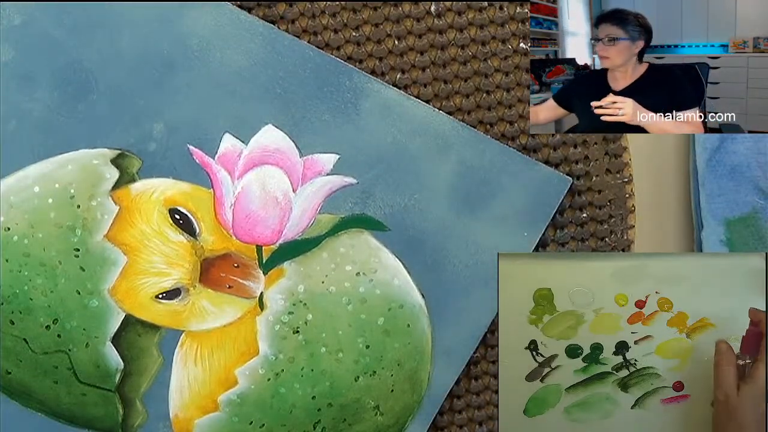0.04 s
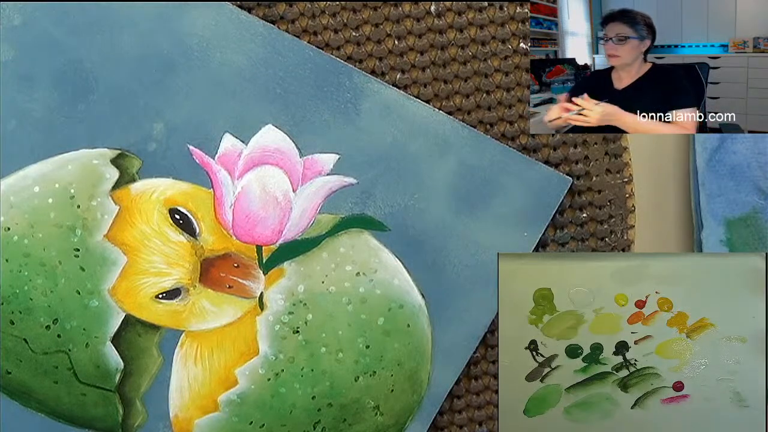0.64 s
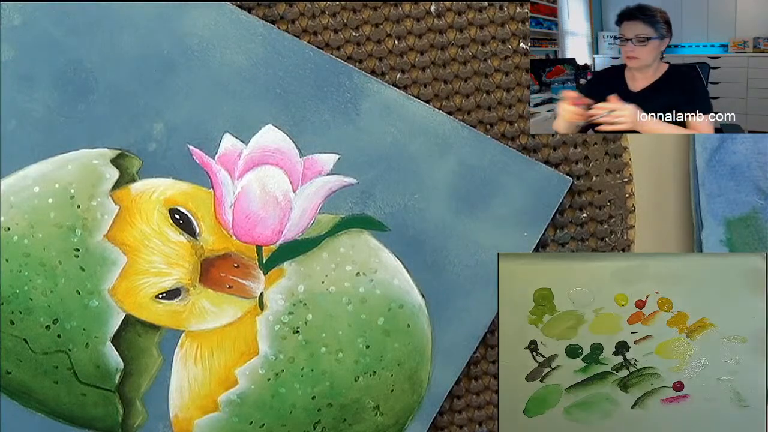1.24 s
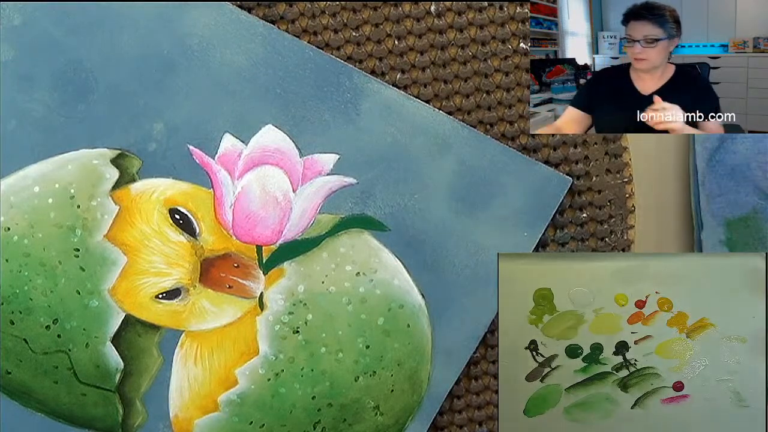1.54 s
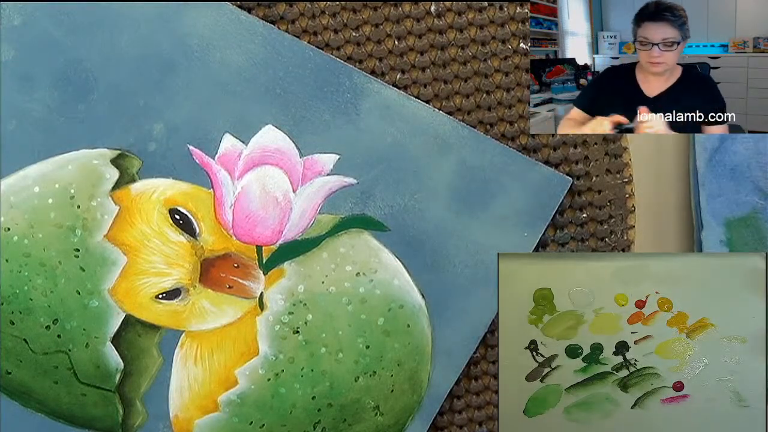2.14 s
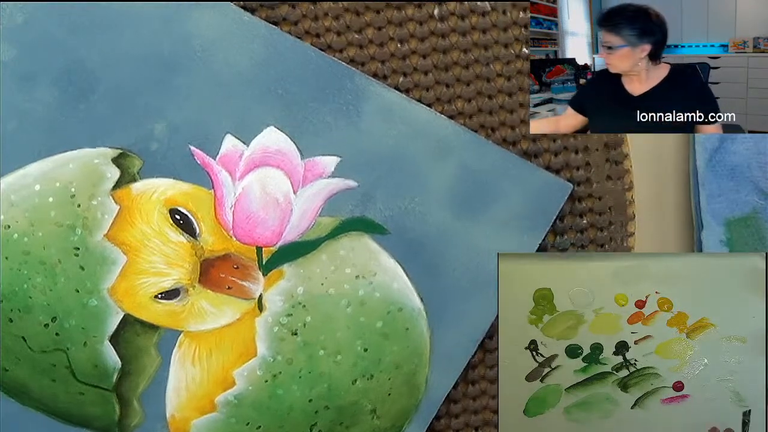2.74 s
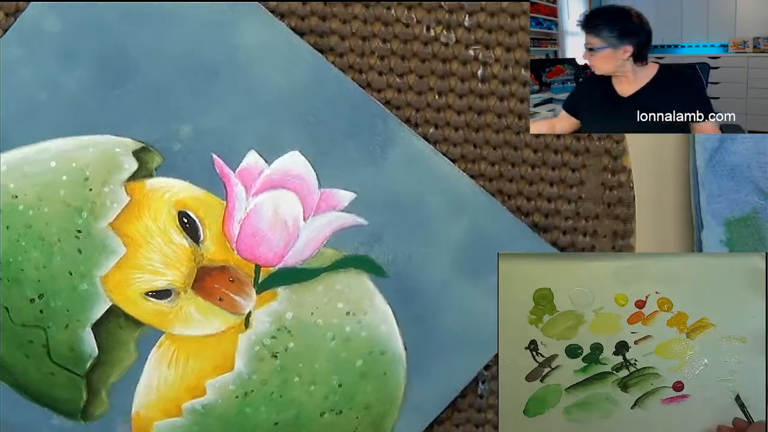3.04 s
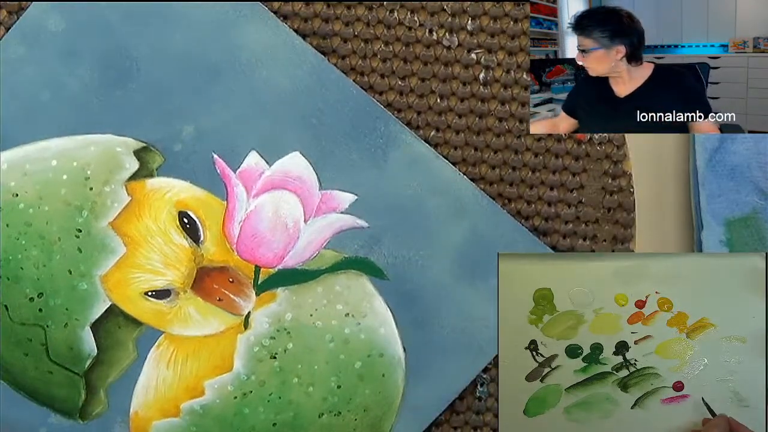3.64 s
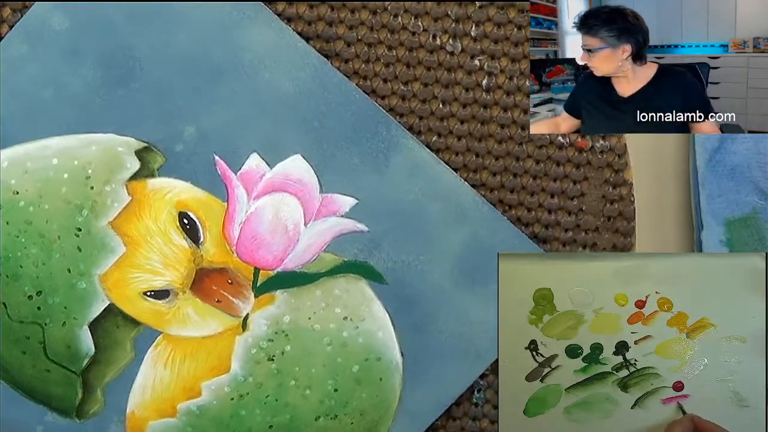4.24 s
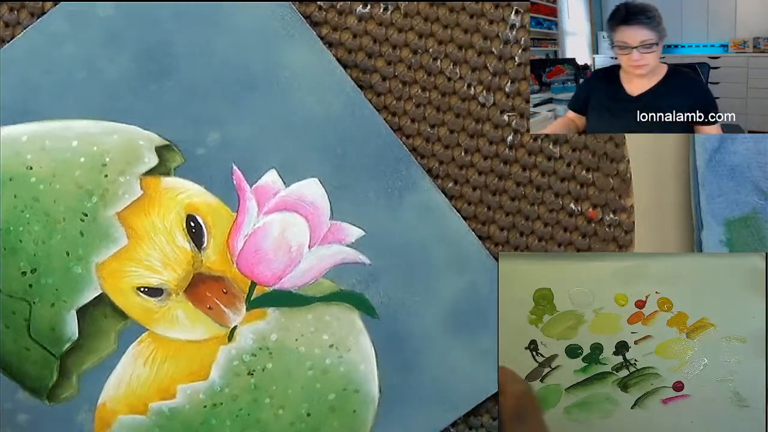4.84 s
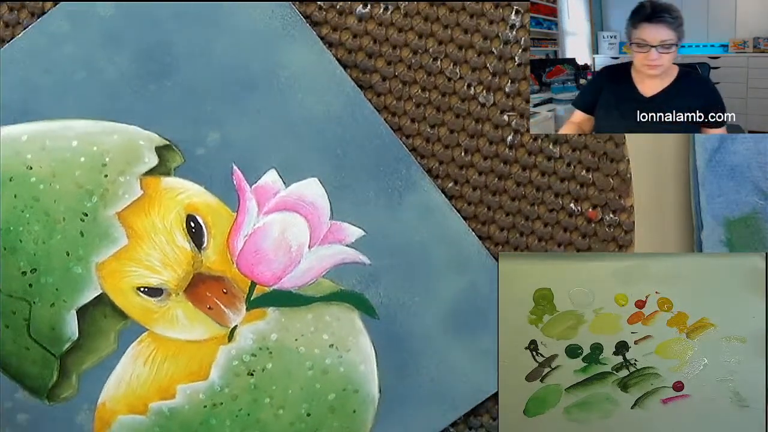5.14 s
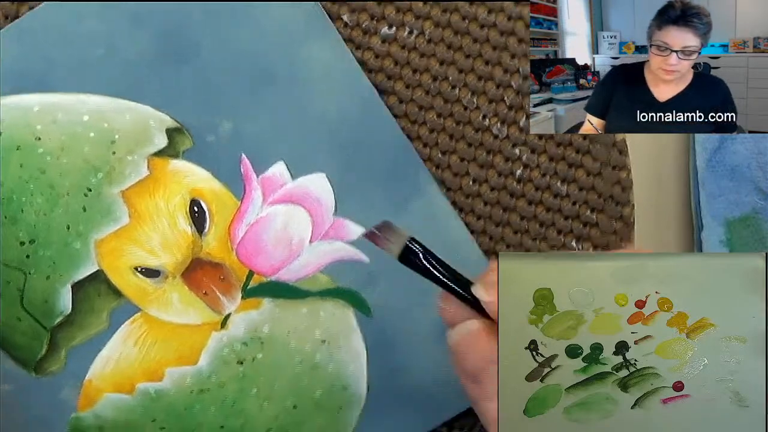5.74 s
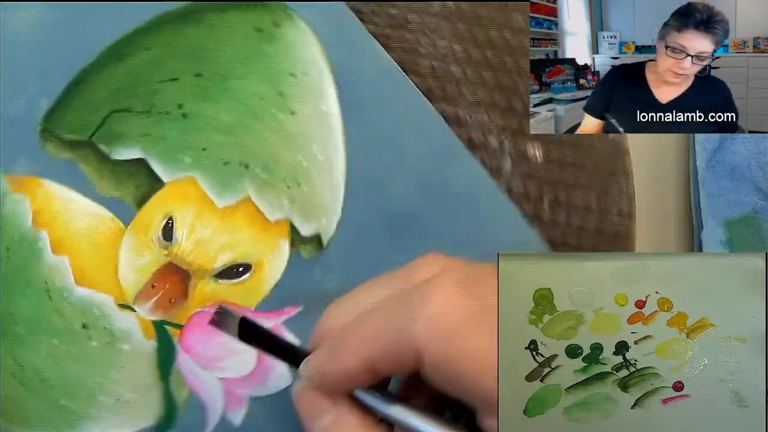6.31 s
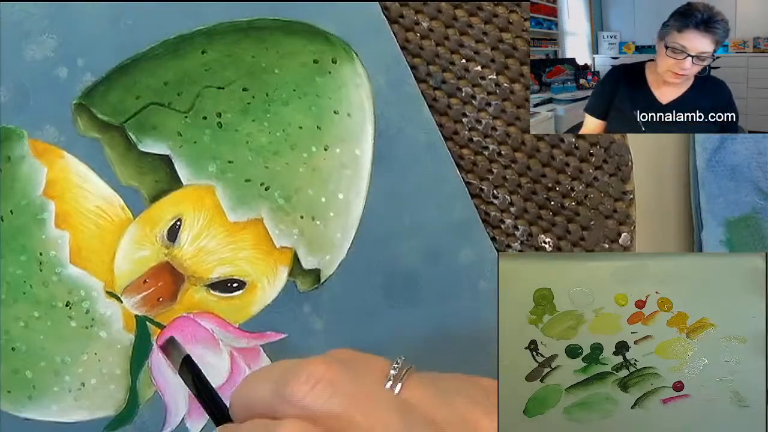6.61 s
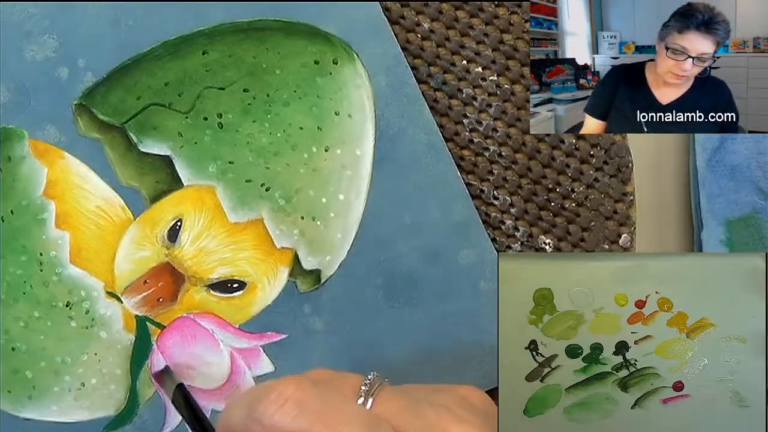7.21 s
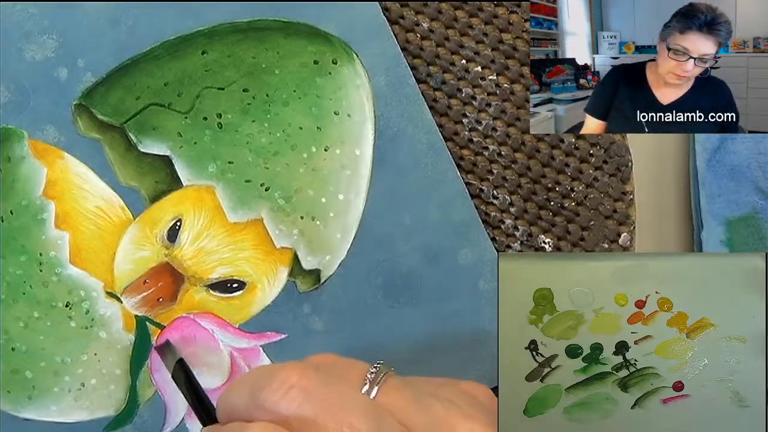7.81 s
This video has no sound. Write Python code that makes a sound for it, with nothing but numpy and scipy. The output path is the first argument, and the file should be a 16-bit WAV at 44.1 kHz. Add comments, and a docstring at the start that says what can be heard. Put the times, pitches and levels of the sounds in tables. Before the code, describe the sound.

In a small room with a steady hum, a fan and a faint thin whine, a spray bottle hisses three times in quick succession. Loud plastic snaps follow, then a soft knock as it is put down. A board shifts over a woven mat in scratchy pushes, a brush is wiped softly, and something taps the desk near the end, all heard from close by.

```python
"""Three quick puffs of mist from a finger-pump bottle, close to one microphone at a painter's desk.
The plastic cap snaps on and the bottle is put down. A painted board is turned on a woven mat,
scraping and catching on the weave; a brush is wiped in short strokes and something taps the desk.
Behind it all, mains hum, a fan and a thin electronic whine fill the small room."""
import sys
import numpy as np
from scipy import signal
from scipy.fft import rfft, irfft
from scipy.io import wavfile

SR = 44100
rng = np.random.default_rng(int(sys.argv[2]) if len(sys.argv) > 2 else 0)


def materialize(psi):
    """Save the field psi as 16-bit PCM at rate SR to the path in sys.argv[1].

    A 1-D psi becomes a single channel; in a 2-D psi each row is a channel.
    """
    bounded = np.clip(np.atleast_2d(psi).T, -1, 1)
    quanta = np.round(bounded * 32767).astype(np.int16)
    wavfile.write(sys.argv[1], SR, quanta)


N = 351477
TIME = np.arange(N) / SR

# Pump strokes: start t/s, end t/s, level/dB
PUMP_STROKES = [(0.001, 0.026, -36), (0.155, 0.162, -33.5), (0.198, 0.232, -36.5), (0.359, 0.361, -33.5),
                (0.394, 0.413, -35.5)]
# Spectrum of the spray: f/Hz, relative level/dB
MIST_SPECTRUM = [(590, -12), (1000, -5.5), (1360, -7.5), (1640, -4.5), (1970, -5), (2450, 1.5), (3300, -2),
                 (4050, 0.5), (5920, -11.5), (6560, -1), (7700, -7.5), (8340, -1.5), (10500, -10),
                 (13200, -5.5), (15500, -17)]
def mist(rise_s=0.00023, fall_s=0.016):
    """The nozzle, close up, hisses while the pump is pressed and dies as the pressure drops."""
    flow = sum(from_db(db) * stroke(start, end, rise_s, fall_s) for start, end, db in PUMP_STROKES)
    return flow * colour(grains(per_s=18000, spread_db=1.5), MIST_SPECTRUM)


# Gulps and low rings of the bottle: t/s, level/dB, f/Hz, t60/s
BOTTLE_RINGS = [(.158, -34.5, 182, 0.17), (.161, -33, 880, 0.063), (.194, -25, 728, 0.028),
                (.225, -44, 770, 0.04), (.272, -46, 666, 0.033), (.298, -31, 710, 0.041),
                (.31, -32, 180, 0.057), (.355, -29.5, 513, 0.038), (.36, -35, 660, 0.029),
                (.392, -21.5, 545, 0.02), (.396, -40, 422, 0.046), (.52, -37, 765, 0.047),
                (1.035, -26, 920, 0.0088), (1.158, -23.5, 476, 0.018), (1.158, -34, 950, 0.013)]
def bottle_rings():
    """Water gulps while pumping; the bottle rings low as the cap snaps on."""
    out = np.zeros(N)
    for s, db, hz, t60 in BOTTLE_RINGS:
        add(out, s, from_db(db) * ring(hz, t60))
    return out


# Pump and cap snaps, plus one loud snap's quick echo off a nearby surface:
# t/s, ring level/dB, ring f/Hz, ring t60/s, rattle level/dB, crack level/dB
SNAPS_AND_ECHO = [(0.101, -50, 12700, .003, -37, -30.5), (0.1517, -22, 2580, 0.026, -50, -24),
                  (.16, -22, 2380, 0.017, -32, -30), (0.1921, -19, 2410, 0.016, -31, -39),
                  (0.307, -28, 13100, 0.0035, -44, -31.5), (.354, -28, 6630, 0.0091, -31, -38),
                  (0.3538, -21, 2370, 0.013, -42, -43), (.361, -22.5, 2340, .012, -37, -31),
                  (.366, -22.5, 2730, 0.024, -45, -42), (.393, -18.5, 2400, 0.0067, -47, -28),
                  (.499, -46, 12500, .003, -35.5, -29.5), (.515, -36, 2420, 0.0093, -21, -38),
                  (0.5281, -30, 2880, 0.0081, -27, -48), (0.7498, -15.5, 2420, 0.0061, -18, -28),
                  (0.816, -31, 11900, 0.0035, -43.5, -49), (.921, -25.5, 2480, 0.015, -33, -48),
                  (.977, -5.5, 2240, 0.023, -17.5, -27), (1.002, -23, 2370, 0.015, -29.5, -47.5),
                  (1.033, -19, 1980, 0.019, -27.5, -17), (1.14, -6.5, 2900, 0.0018, -29, -26),
                  (1.1572, -7, 2920, 0.0082, -18.5, -13.5), (1.1594, 1.5, 2830, 0.0028, -16.5, -21.5),
                  (1.237, -54, 13000, .003, -55, -53), (1.364, -47, 2000, .01, -44, -44)]
# Spectrum of a hard contact, on the bottle or the desk: f/Hz, relative level/dB
CRACK_SPECTRUM = [(200, -18.5), (500, -12), (700, 0.5), (1100, -1), (2000, 1.5), (4000, 3.5), (5700, -3.5),
                  (7000, -1), (8500, -1), (10000, -18.5), (12000, -7), (16000, -23.5)]
def plastic(shell_width_hz=1900, shell_ratio=1.03):
    """Plastic cracks, the shell's crowded modes rattle and the cap's cavity rings; one snap echoes."""
    rings, cracks = np.zeros((2, N))
    for s, ring_db, hz, t60, rattle_db, crack_db in SNAPS_AND_ECHO:
        shell_hz = shell_ratio * hz   # the shell's modes lie above the cavity's
        rattle = band(crack(t60=0.022, grit=1.3), shell_hz, shell_width_hz)
        add(rings, s, from_db(ring_db) * ring(hz, t60))
        add(rings, s, from_db(rattle_db) * 2 * rattle / np.abs(rattle).max())
        add(cracks, s, from_db(crack_db) * crack(t60=0.017, grit=1.9))
    return rings + colour(cracks, CRACK_SPECTRUM)


# Pushes across the mat: start t/s, end t/s, level/dB, treble share/dB
BOARD_PUSHES = [(2.592, 2.677, -49.5, -6), (2.719, 2.805, -50, -6), (2.896, 2.97, -52.5, -14),
                (4.694, 4.802, -46.5, -5.5), (5.215, 5.43, -52.5, -19), (5.653, 5.86, -51.5, -4.5),
                (5.866, 6.407, -40, -2.5), (6.237, 6.268, -46, -2), (6.312, 6.335, -49, -1)]
# The board's edge catching hard on the weave: t/s, level/dB, treble share/dB
HARD_SNAGS = [(2.298, -38, -6), (2.3994, -36, -22.5), (2.6364, -19, -20), (2.657, -29, -14),
              (2.787, -26.5, -18), (2.926, -32.5, -14), (3.2091, -36, -4), (3.2273, -35, -12),
              (3.29, -43, 0), (4.1782, -29.5, -18), (4.454, -29.5, 4), (4.7248, -28, -1),
              (4.765, -15, -5.5), (4.807, -19, 0), (4.8112, -15.5, -5.5), (5.043, -24, -1),
              (5.1536, -36, -12), (5.2824, -31, -4), (5.369, -37, 4.5), (5.433, -30, -26),
              (5.5364, -36, -21), (5.7636, -31, 4), (5.7746, -27.5, 2.5), (5.849, -24, -4.5),
              (5.885, -24.5, -2), (5.9334, -16, -6.5), (5.9646, -25, 3), (6.045, -28, 5), (6.1853, -22, 2),
              (6.269, -18.5, 1.5), (6.2723, -16, -0.5), (6.3116, -16.5, 1), (6.3308, -26, 1)]
# Spectrum of the scrape: f/Hz, relative level/dB
SCRAPE_SPECTRUM = [(200, 1.5), (350, 2), (500, -10), (750, -1.5), (1000, -4.5), (1400, 0.5), (1750, 0.5),
                   (2900, -2), (4200, -2.5), (5700, -7), (6400, -1), (8500, -3.5), (9900, -14.5),
                   (12300, -12.5), (15500, -24)]
# Resonances of the board: f/Hz, width/Hz, level/dB
BOARD_MODES = [(710, 76, -9), (1385, 80, -0.5), (2240, 185, 4.5), (2970, 170, 0)]
def board(scrape_db=-4, snag_db=-7, scrape_treble_db=3, snag_treble_db=5, ring_db=-9, split_hz=5400):
    """Dense slips and snags on the mat drive the board's resonances; sharper contacts are brighter."""
    speed, sharp_speed, snags, sharp_snags, rings = np.zeros((5, N))
    for start, end, db, treble_db in BOARD_PUSHES:
        push = from_db(db) * stroke(start, end, rise_s=0.035, fall_s=0.036)
        speed += push
        sharp_speed += from_db(treble_db) * push
    for s, db, treble_db in HARD_SNAGS + catches(speed):
        add(rings, s, from_db(db + ring_db) * ring(hz=2150, t60=0.0072))
        snag = from_db(db + snag_db) * crack(t60=0.024, grit=2.6)
        add(snags, s, snag)
        add(sharp_snags, s, from_db(treble_db + snag_treble_db) * snag)
    grip = from_db(3 * drift(68))   # varies from strand to strand
    slips = from_db(scrape_db) * grip * grains(per_s=2200, spread_db=1.0)
    lowpass = signal.butter(3, split_hz, fs=SR, output="sos")
    highpass = signal.butter(3, split_hz, "high", fs=SR, output="sos")
    dull = signal.sosfilt(lowpass, speed * slips + snags)
    sharp = signal.sosfilt(highpass, sharp_speed * from_db(scrape_treble_db) * slips + sharp_snags)
    drive = colour(dull + sharp, SCRAPE_SPECTRUM)
    body = sum(from_db(db) * signal.lfilter(*signal.iirpeak(hz, hz / width, fs=SR), drive)
               for hz, width, db in BOARD_MODES)
    return rings + drive + body


def catches(speed, per_s=32, above_speed_db=12, spread_db=3, step=100):
    """The moving board catches at random, harder with speed; rows as in HARD_SNAGS."""
    tries = np.arange(0, N, step)
    chance = rng.random(len(tries))
    size = np.clip(rng.standard_normal(len(tries)), -2, 2)
    caught = (chance < per_s * step / SR) & (speed[tries] > from_db(-60))
    return [(TIME[i], 20 * np.log10(speed[i]) + above_speed_db + spread_db * z, 0)
            for i, z in zip(tries[caught], size[caught])]


# Knocks on the desk, plus the sharp tap's quick echo:
# t/s, thud level/dB, thud f/Hz, tap level/dB, tap f/Hz, tap t60/s, crack level/dB
KNOCKS_AND_ECHO = [(1.798, -45, 350, -50, 2600, .008, -41), (1.805, -26.5, 348, -36, 1450, 0.02, -34),
                   (1.826, -36, 600, -50, 3290, .012, -35), (1.851, -27.5, 59.7, -38.5, 700, .02, -46),
                   (2.615, -46, 354, -39, 736, 0.018, -53), (2.636, -33, 340, -29.5, 1446, 0.011, -47),
                   (6.302, -41, 55, -53, 700, 0.022, -54), (6.65, -73, 230.4, -38, 2260, 0.023, -55),
                   (6.661, -27.5, 228, -19, 1434, 0.017, -44), (6.677, -37, 220, -45, 1400, 0.0065, -53),
                   (7.189, -56, 238, -48, 1675, 0.016, -66), (7.543, -31.5, 175, -42, 3200, 0.012, -49)]
# Modes of the desk: f/Hz, level/dB, t60/s
DESK_MODES = [(59.9, -1, 0.15), (173, -9.5, 0.098), (223, -9, 0.2), (345, -1.5, 0.096), (452, -10.5, 0.033),
              (624, 0.5, 0.035)]
def knocks(db_per_octave=-7, clatter_db=-5):
    """The desk thuds in the modes that suit the spot struck and the striker rings; one tap echoes."""
    rings, cracks = np.zeros((2, N))
    for s, thud_db, thud_hz, tap_db, tap_hz, tap_t60, crack_db in KNOCKS_AND_ECHO:
        thud = sum((-1) ** k * from_db(db + db_per_octave * abs(np.log2(hz / thud_hz))) * ring(hz, t60)
                   for k, (hz, db, t60) in enumerate(DESK_MODES))
        clatter = band(crack(t60=0.13, grit=1.1), tap_hz, 1.23 * tap_hz)
        add(rings, s, from_db(thud_db) * thud + from_db(tap_db) * ring(tap_hz, tap_t60))
        add(rings, s, from_db(tap_db + clatter_db) * clatter)
        add(cracks, s, from_db(crack_db) * crack(t60=0.083, grit=4.8))
    return rings + colour(cracks, CRACK_SPECTRUM)


# Soft rubs and squeaks, and a faint ringing fizz in the bottle:
# start t/s, end t/s, level/dB, centre f/Hz, width/Hz
RUBS_AND_FIZZ = [(.01, 0.138, -57.5, 1595, 150), (0.284, 0.322, -49.5, 2740, 1210),
                 (0.514, 0.538, -37.5, 2880, 1000), (.58, 0.882, -60, 1510, 220),
                 (0.888, 0.917, -47, 2270, 900), (1.04, 1.103, -63, 12600, 4000),
                 (1.311, 1.365, -54.5, 2440, 1810), (1.314, 1.36, -55.5, 8060, 7030),
                 (6.423, 6.437, -47.5, 3650, 450)]
def rubs_and_fizz():
    """Dense tiny clicks sound a resonance, heard as a rub, a squeak or a fizz."""
    clicks = grains(per_s=7900, spread_db=4.0)
    return sum(from_db(db) * stroke(start, end, 0.0067, 0.01) * unit_rms(band(clicks, hz, width))
               for start, end, db, hz, width in RUBS_AND_FIZZ)


# Wipes of the brush: start t/s, end t/s, level/dB
BRUSH_WIPES = [(3.838, 3.849, -50.5), (3.88, 3.942, -56), (4.052, 4.141, -56.5), (4.168, 4.18, -50.5),
               (4.245, 4.333, -57), (4.359, 4.43, -55.5), (4.435, 4.489, -53.5), (4.526, 4.568, -64),
               (4.593, 4.68, -54), (7.16, 7.21, -69), (7.425, 7.456, -62), (7.52, 7.568, -58)]
# Spectrum of the bristles: f/Hz, relative level/dB
BRISTLE_SPECTRUM = [(500, 5.5), (1000, -4.5), (1450, 4), (1800, 1.5), (2250, 6.5), (3000, 2.5),
                    (5500, -8.5), (7000, -3.5), (8500, -4), (10000, -9.5), (13200, -3.5), (14300, -9),
                    (16000, -18)]
def brush():
    """Bristles flick past one another during each stroke, faint even at close range."""
    pressure = sum(from_db(db) * stroke(start, end, 0.025, 0.011) for start, end, db in BRUSH_WIPES)
    flicker = from_db(2.1 * drift(47))
    return pressure * flicker * colour(grains(per_s=5000, spread_db=1.0), BRISTLE_SPECTRUM)


# Steady tones in the room: f/Hz, rms level/dB
HUM_TONES = [(60, -66), (120, -46), (240, -64), (351, -64), (441, -91)]
def mains_hum():
    """The mains hums low behind the work at the desk."""
    return sum(from_db(db) * np.sqrt(2) * np.sin(2 * np.pi * (hz * TIME + rng.random()))
               for hz, db in HUM_TONES)


# Spectrum of the fan: f/Hz, relative level/dB
FAN_SPECTRUM = [(20, -30), (35, -2), (58, 0.5), (80, -1), (130, 3), (230, -2.5), (350, -6), (500, -12.5),
                (1000, -22.5), (2200, -24), (4000, -28), (6000, -36), (12000, -36.5), (16000, -45.5)]
def fan(level_db=-51.5):
    """A fan fills the room with a low, even rush."""
    return from_db(level_db) * colour(rng.standard_normal(N), FAN_SPECTRUM)


# Upward jumps of the whine: start t/s, end t/s, f/Hz
WHINE_JUMPS = [(2.237, 2.308, 10140), (4.127, 4.19, 9900), (7.891, 7.956, 9950)]
def whine(base_hz=9214, base_db=-70, jump_db=-4):
    """A thin electronic tone wavers in the background and weakens when its pitch jumps."""
    pitch = base_hz + 34 * drift(90)
    level_db = base_db + 1.8 * drift(40)
    for start, end, hz in WHINE_JUMPS:
        jumping = (TIME > start) & (TIME < end)
        pitch += jumping * (hz - base_hz + 230 * drift(245))
        level_db += jumping * jump_db
    return from_db(level_db) * np.sqrt(2) * np.sin(2 * np.pi * np.cumsum(pitch) / SR)


# Decay of the small room: f/Hz, t60/s
ROOM_DECAY = [(150, .28), (600, .26), (1500, .25), (3000, .22), (5000, .23), (14000, .2)]
def room(x, wet_db, build_s=0.0045):
    """Direct sound reaches the microphone first; reflections build up and die band by band."""
    t = TIME[:SR // 2]
    tail = np.zeros(len(t))
    for hz in np.geomspace(140, 12500, 8):
        decay = from_db(-60 * t / at_hz(ROOM_DECAY, hz))
        tail += band(rng.standard_normal(len(t)), hz, 0.65 * hz) * decay
    tail *= 1 - np.exp(-(t / build_s) ** 2)
    return x + from_db(wet_db) * signal.fftconvolve(x, tail / np.linalg.norm(tail))[:N]


def ring(hz, t60):
    """A struck mode: swells within a cycle, then dies."""
    t = TIME[:SR // 3]
    return np.sin(2 * np.pi * hz * t) * from_db(-60 * t / t60) * (1 - np.exp(-2 * hz * t))


def crack(t60, grit):
    """One hard touch, then a burst of tiny slips; grit is their size against the touch."""
    fall = from_db(-60 * TIME[:SR // 10] / t60)
    slips = rng.standard_normal(len(fall)) * fall
    burst = grit * slips / np.linalg.norm(slips) + signal.unit_impulse(len(fall))
    return 0.5 * burst * np.linalg.norm(fall) / np.linalg.norm(burst)


def grains(per_s, spread_db):
    """Random clicks of uneven size; rms 1."""
    sizes = from_db(spread_db * np.minimum(rng.exponential(1, N), 4)) * rng.choice([-1, 1], N)
    return unit_rms(sizes * (rng.random(N) < per_s / SR))


def stroke(start, end, rise_s, fall_s):
    """An envelope that rises, holds and dies away."""
    return np.clip((TIME - start) / rise_s, 0, 1) * np.exp(-np.maximum(TIME - end, 0) / fall_s)


def drift(rate_hz, step=40, settle=2000):
    """A smooth random wander with spread 1."""
    pole = np.exp(-2 * np.pi * rate_hz * step / SR)
    noise = rng.standard_normal(N // step + settle + 2)
    slow = signal.lfilter([1], [1, -2 * pole, pole * pole], noise)[settle:]
    return np.interp(np.arange(N) / step, np.arange(len(slow)), unit_rms(slow))


def band(x, hz, width):
    """A broad resonance with steep skirts."""
    low = np.sqrt(hz ** 2 + width ** 2 / 4) - width / 2
    high = min(low + width, 0.45 * SR)
    return signal.sosfilt(signal.butter(2, [low, high], "band", fs=SR, output="sos"), x)


def colour(x, spectrum, size=8192):
    """Minimum-phase filter of unit energy with the given spectrum."""
    hz = np.arange(size // 2 + 1) * SR / size
    cepstrum = irfft(np.log(from_db(at_hz(spectrum, hz))))
    cepstrum[1:size // 2] *= 2
    cepstrum[size // 2 + 1:] = 0
    response = irfft(np.exp(rfft(cepstrum)))
    return signal.fftconvolve(x, response / np.linalg.norm(response))[:N]


def at_hz(points, hz):
    """Read a table on a log-frequency axis."""
    f, value = np.transpose(points)
    return np.interp(np.log(np.maximum(hz, 1)), np.log(f), value)


def add(track, s, sound):
    """Mix a sound into the track at time s."""
    start = max(round(s * SR), 0)
    track[start:start + len(sound)] += sound[:N - start]


def from_db(db):
    """Decibels to gain."""
    return 10 ** (np.asarray(db) / 20)


def unit_rms(x):
    """Scale to rms 1."""
    return x / np.sqrt(np.mean(x ** 2) + 1e-20)


def scene():
    """One microphone at the desk: bottle, board and brush close by, room tone behind."""
    spray = room(mist() + bottle_rings() + rubs_and_fizz(), wet_db=-6.5)
    snaps = room(plastic(), wet_db=-9)
    desk = room(knocks() + board() + brush(), wet_db=-9)
    room_tone = mains_hum() + fan() + whine()
    return (spray + snaps + desk + room_tone)[None]


def record(dry):
    """The microphone signal is cut steeply above 15780 Hz."""
    return signal.sosfilt(signal.ellip(10, 0.1, 80, 15780, fs=SR, output="sos"), dry)


dry = scene()
out = record(dry)
materialize(out)
```